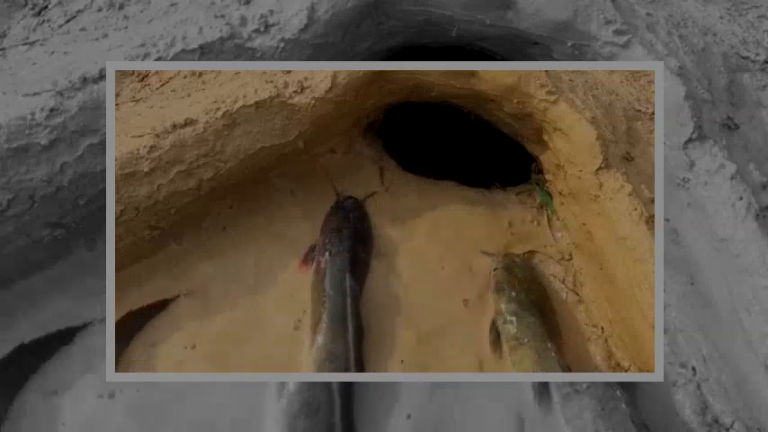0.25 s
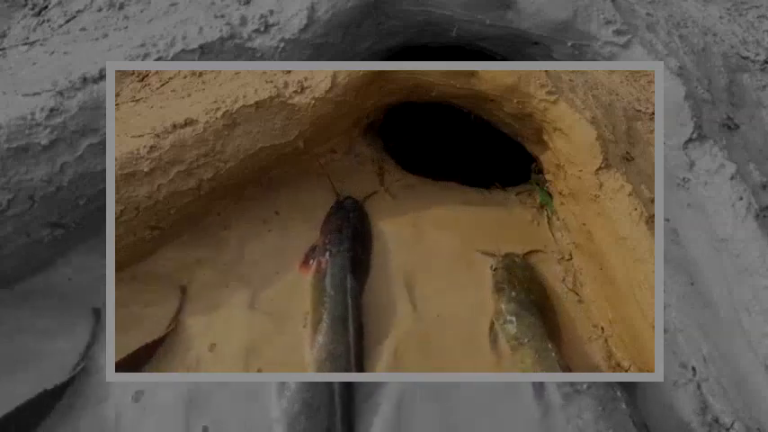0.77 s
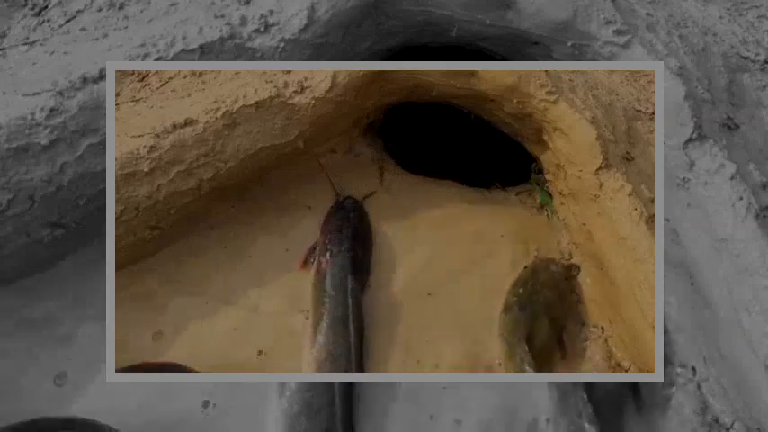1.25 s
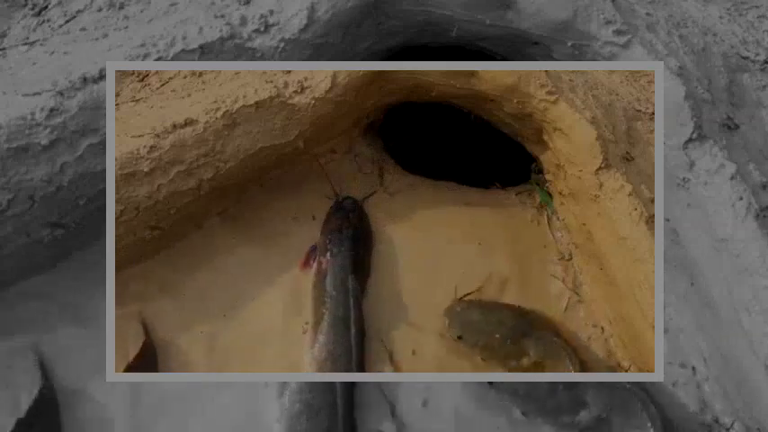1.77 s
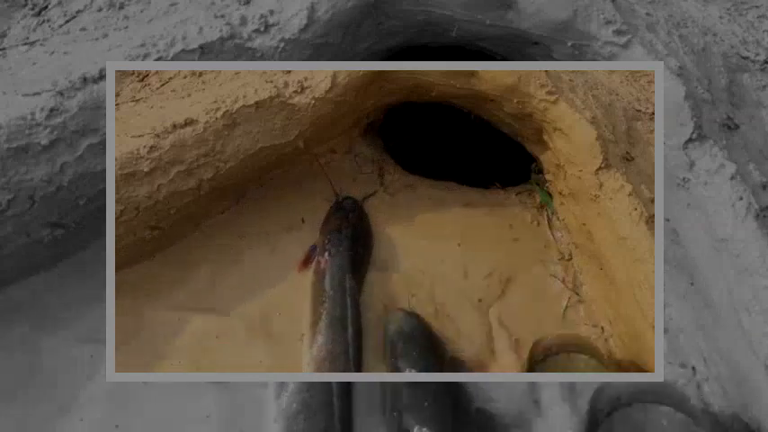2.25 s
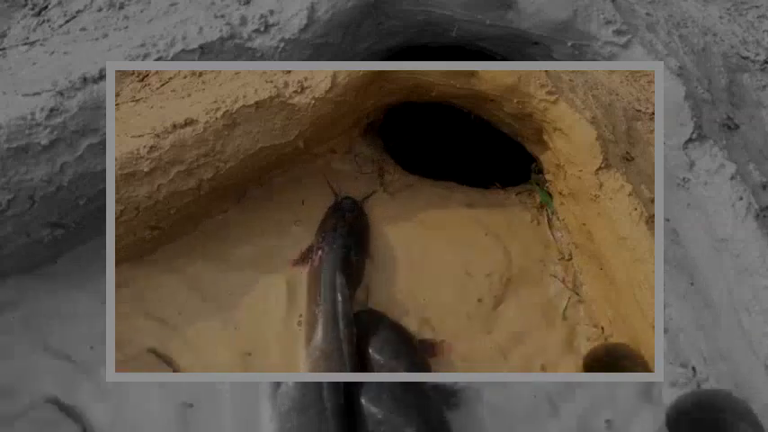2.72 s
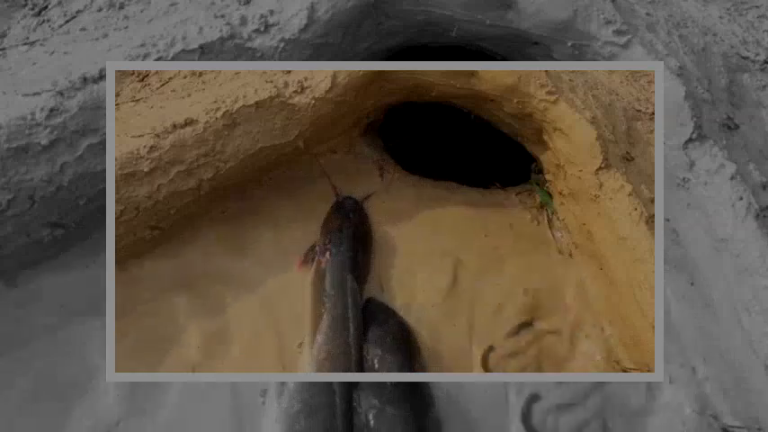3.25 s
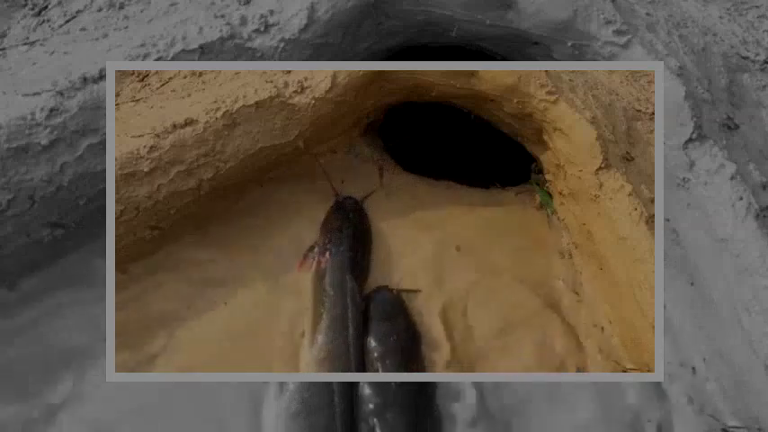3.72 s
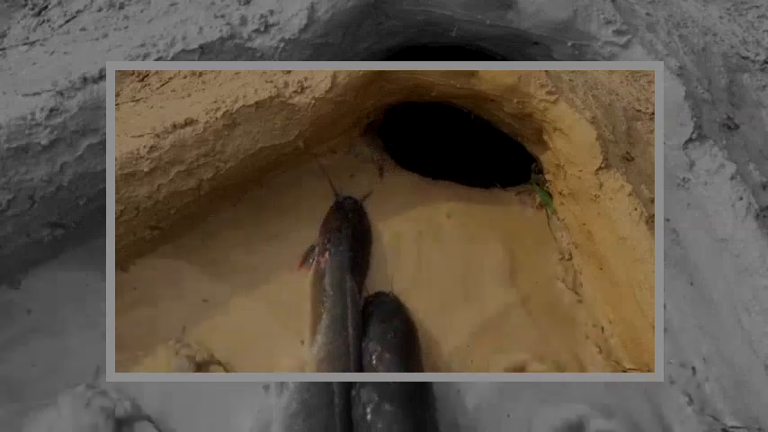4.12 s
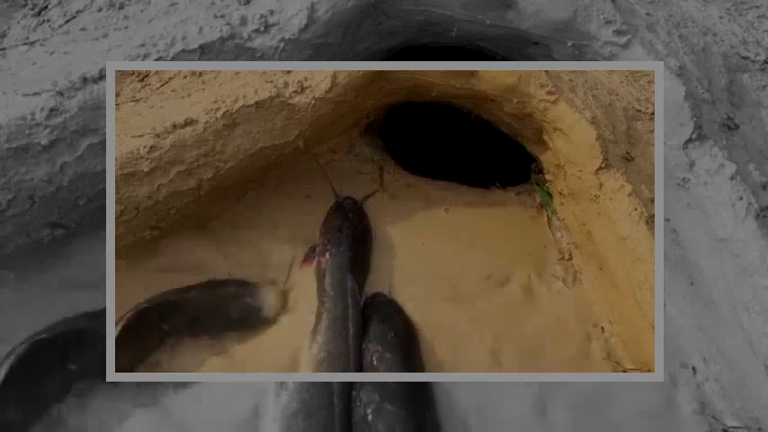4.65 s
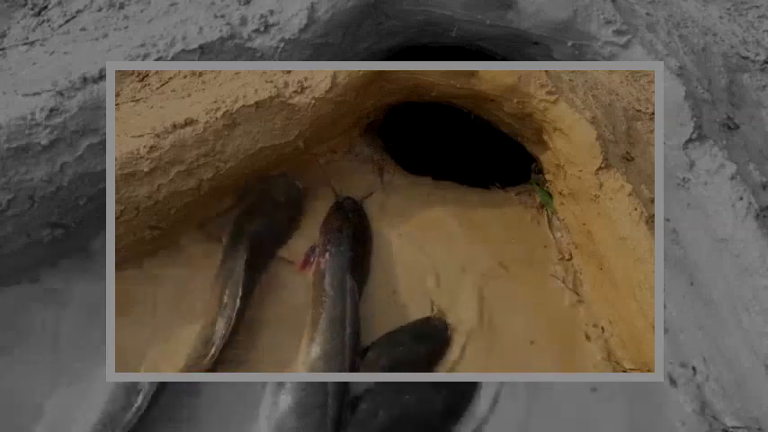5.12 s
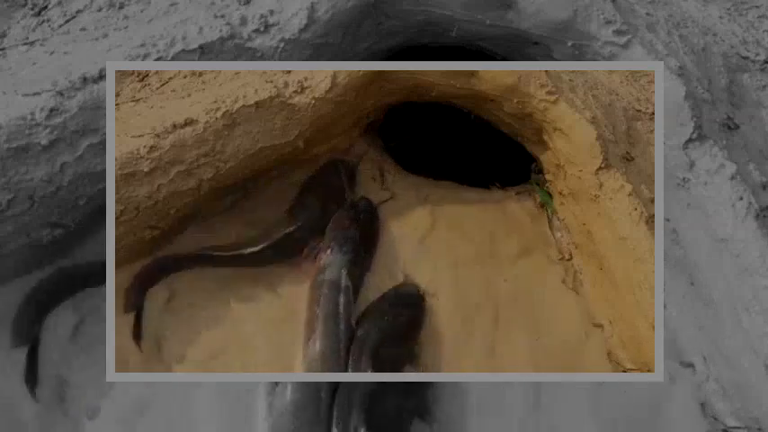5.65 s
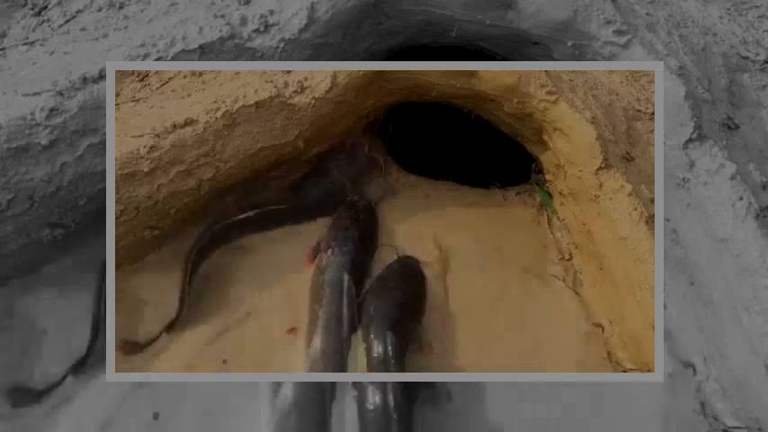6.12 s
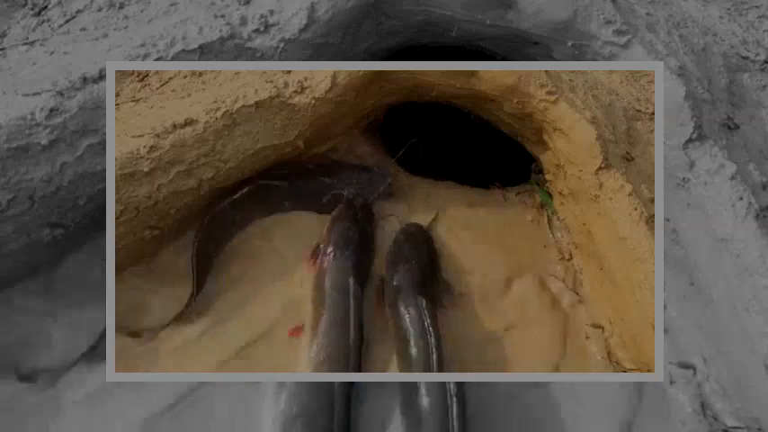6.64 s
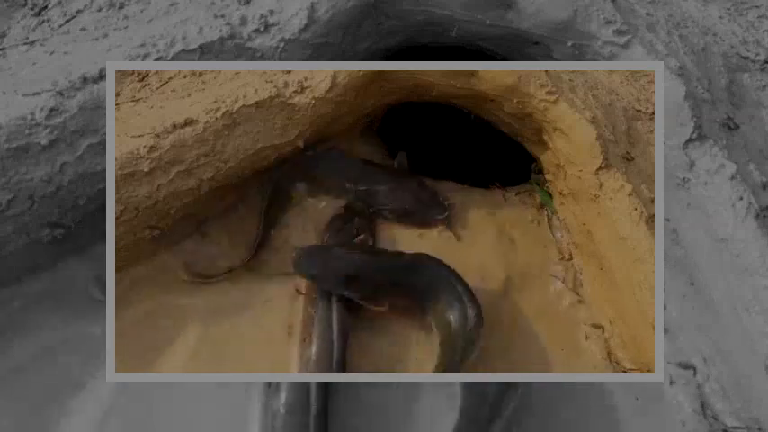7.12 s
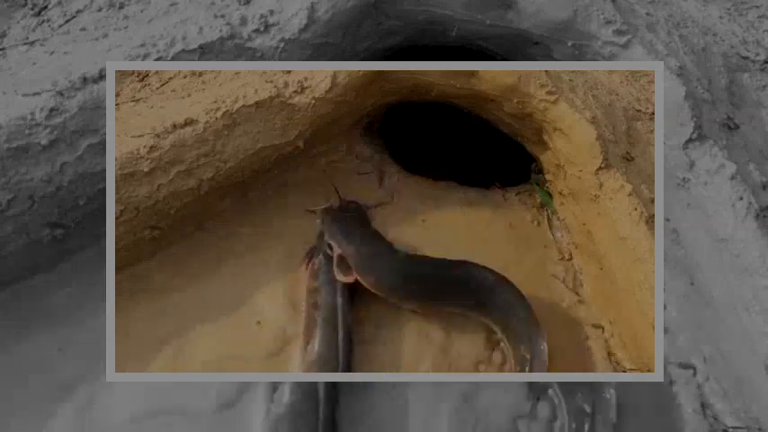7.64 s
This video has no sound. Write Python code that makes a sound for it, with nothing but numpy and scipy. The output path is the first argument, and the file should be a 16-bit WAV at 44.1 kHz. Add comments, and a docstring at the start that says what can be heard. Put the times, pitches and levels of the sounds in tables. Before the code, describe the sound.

Fish thrash in a shallow muddy pool under a clay bank. A quick cluster of wet pops, churning splashes and spits opens, then scattered plips and small bubbling strokes. The middle grows sparse, with faint lapping and soft glugs, before a loud double plop and vigorous splashing near the end. Close mono microphone, slightly hollow and metallic, with a short slap echo and low outdoor background.

```python
"""Catfish in a muddy pool

At the foot of a clay bank, catfish wriggle in shallow water under a low outdoor background, in mono.
Strokes of tail and body swell random bubble froth, throw spray and shove the water in low noise.
Air pockets in the wet mud pop and plip as gliding, choked sine rings; sinking sines make the glugs.
Fizzing and lapping never stop. All but the background has a slap echo, and two close copies
of the whole give a hollow, slightly metallic colour."""
import sys
import numpy as np
from scipy import signal
from scipy.fft import rfft, irfft, next_fast_len
from scipy.io import wavfile

SR = 44100
rng = np.random.default_rng(int(sys.argv[2]) if len(sys.argv) > 2 else 0)


def to_wav(sig):
    """Store sig (one row per channel, or 1-D mono) as 16-bit WAV at the path in sys.argv[1].

    Samples outside -1..1 are clipped; the rate is SR.
    """
    pcm = np.clip(np.atleast_2d(sig), -1, 1) * 32767
    pcm = np.round(pcm).astype(np.int16)
    wavfile.write(sys.argv[1], SR, pcm.T)  # frames by channels


N = 347508

# Air pockets that burst in the mud: (time [s], ring level [dB], pitch [Hz], ring length [s],
# snap level [dB], echo delay [s])
POCKETS = [(0.1, -16, 1023, 0.056, -39, 0.027), (.131, -20, 1370, 0.072, -4.5, 0.056),
           (0.176, -13, 985, 0.022, -28, 0.072), (.19, -30, 300, 0.023, -47, 0.066),
           (.204, -13.5, 931, 0.038, -10, 0.069), (.218, -23.5, 597, 0.044, -17, .068),
           (.295, -28, 2404, 0.048, -35, .051), (.376, -22.5, 4430, 0.002, -40, 0.062),
           (.555, -36, 2150, 0.013, -34, 0.051), (.5757, -30.5, 4060, 0.012, -49, 0.054),
           (.9687, -17, 2430, 0.0041, -44, .065), (1.068, -16.5, 967, 0.0088, -17.5, .057),
           (1.116, -37, 3720, .007, -37, .04), (1.2025, -33.5, 1960, 0.018, -32, 0.053),
           (1.2712, -22, 2700, 0.02, -28, 0.058), (1.272, -25.5, 1700, 0.024, -37, 0.058),
           (1.297, -27.5, 1730, 0.01, -50, .045), (1.378, -19.5, 2300, .0077, -19.5, .055),
           (1.556, -34.5, 1260, 0.0075, -51, 0.066), (1.6074, -33.5, 1225, 0.024, -28.5, 0.062),
           (1.656, -34.5, 4110, 0.01, -45, 0.048), (1.6826, -29, 1886, 0.019, -41, 0.065),
           (1.831, -30, 1864, 0.024, -55, 0.051), (1.901, -36, 303, 0.015, -38, .07),
           (1.955, -32.5, 330, 0.023, -50, 0.064), (2.066, -24, 2670, 0.005, -49, .048),
           (2.08, -29, 3190, 0.014, -53, 0.064), (2.2246, -26.5, 2546, 0.025, -48, .065),
           (2.2663, -13, 821, 0.027, -21, 0.058), (2.276, -16.5, 1035, 0.032, -39, 0.056),
           (2.29, -20.5, 857, 0.036, -46, 0.057), (2.3425, -15.5, 1490, 0.0083, -11, 0.061),
           (2.358, -24.5, 1090, 0.059, -21, 0.064), (2.4776, -21.5, 1347, .04, -35, 0.051),
           (2.478, -23, 4160, 0.0046, -40, .056), (2.498, -27, 1306, 0.023, -26, 0.067),
           (2.655, -35, 3770, .012, -49, 0.078), (2.7558, -21.5, 454, 0.0035, -21, 0.057),
           (2.763, -25.5, 1797, 0.017, -37, 0.047), (2.779, -29, 3360, 0.024, -44, 0.056),
           (2.9118, -36.5, 3700, 0.012, -43, .066), (3.2445, -18.5, 710, 0.015, -25, 0.062),
           (3.2925, -22, 1610, 0.0029, -39, .064), (3.392, -39.5, 1025, 0.051, -55, .06),
           (3.4335, -30.5, 1830, 0.0048, -59, .051), (3.516, -42.5, 1363, 0.049, -60, .058),
           (3.906, -26, 1720, 0.0061, -23, 0.054), (3.9396, -19.5, 2740, 0.017, -42, 0.063),
           (3.9925, -20.5, 1396, 0.025, -21, 0.066), (4.146, -37.5, 3560, 0.011, -53, .054),
           (4.158, -38, 1780, 0.02, -34, .054), (4.516, -38.5, 900, 0.015, -35, 0.036),
           (4.8, -32, 1610, 0.075, -60, 0.054), (4.908, -33, 580, 0.011, -53, 0.057),
           (5.3157, -25.5, 2440, 0.017, -36, 0.048), (5.3627, -20.5, 907, 0.024, -26, .057),
           (5.4006, -21, 1160, 0.0082, -27, 0.061), (5.4524, -22, 2840, 0.0029, -34, 0.057),
           (5.491, -34, 284, .022, -51, 0.058), (5.5285, -30, 3125, 0.017, -36, 0.068),
           (5.591, -22.5, 2042, 0.028, -37, .052), (5.594, -29, 3020, 0.017, -52, 0.049),
           (5.769, -18, 1496, 0.025, -33, .061), (5.783, -15.5, 1310, 0.033, -33, 0.065),
           (5.787, -14, 1770, 0.035, -33, .068), (5.801, -35, 2730, 0.042, -42, 0.068),
           (6.0755, -27, 2740, 0.016, -28.5, 0.064), (6.103, -32.5, 1330, 0.019, -26, 0.057),
           (6.429, -31.5, 2130, 0.023, -58, 0.061), (6.5359, -25.5, 4050, 0.0097, -41, 0.066),
           (6.554, -23, 1680, 0.0091, -20, 0.065), (6.633, -32, 1650, 0.033, -42, .059),
           (6.634, -36.5, 3630, 0.024, -57, 0.058), (6.8443, -28.5, 5830, 0.0045, -60, .064),
           (6.878, -33, 2550, 0.0077, -24.5, 0.062), (7.1217, -18.5, 2950, 0.0013, -29, 0.068),
           (7.1591, -2.5, 1146, 0.025, -3.5, 0.056), (7.161, -4.5, 2027, 0.016, -3, .058),
           (7.175, -12, 1096, 0.047, -13, .059), (7.3308, -11, 1510, 0.015, -23.5, .059),
           (7.376, -21, 2226, 0.022, -12.5, 0.07), (7.3917, -26.5, 1580, 0.0087, -29, 0.047),
           (7.5395, -11.5, 2400, 0.0048, -34, 0.071), (7.569, -21, 1110, 0.023, -23, 0.067),
           (7.6045, -18, 2400, .006, -36, 0.029), (7.64, -15.5, 1794, .062, -42, .074),
           (7.678, -5, 791, 0.079, -9, 0.066), (7.7, -16.5, 543, .15, -30, 0.059),
           (7.7, -2.5, 4680, 0.003, -38, .065), (7.711, -24, 1852, 0.11, -7, 0.066),
           (7.813, -16, 1067, 0.05, -19, 0.057), (7.845, -16, 1784, 0.059, -23, .066),
           (7.862, -17.5, 1360, 0.013, -30, .066)]
# Strokes of a tail or body: (time of its height [s], rise [s], churn level [dB],
# churn centre [Hz], spray level [dB])
BODY_STROKES = [(0.039, 0.046, -44.5, 1940, -50), (0.13, 0.024, -35, 2680, -29.5),
                (0.167, 0.014, -20, 930, -28), (0.209, 0.012, -22, 2000, -29),
                (0.292, .018, -28.5, 2350, -33.5), (.375, 0.016, -38.5, 1670, -45.5),
                (.47, 0.063, -48.5, 1020, -54.5), (0.554, 0.0085, -55, 2700, -42.5),
                (0.844, 0.093, -39.5, 1190, -54), (1.276, 0.015, -39.5, 2150, -69),
                (1.984, 0.006, -40, 1310, -47), (2.084, 0.033, -41.5, 1880, -83),
                (2.238, 0.0095, -32.5, 1460, -58), (2.339, 0.022, -31, 1510, -49),
                (2.488, 0.0054, -25, 2550, -64), (2.773, .02, -34, 1750, -70),
                (3.39, 0.033, -51.5, 1060, -93), (4.352, 0.046, -41, 1490, -51),
                (4.52, 0.055, -43, 950, -58.5), (4.681, 0.031, -40, 880, -65),
                (4.937, 0.044, -44, 1590, -53), (5.277, 0.015, -38.5, 1670, -49),
                (5.362, 0.027, -34, 1170, -57), (5.787, 0.016, -27.5, 2040, -66),
                (6.107, 0.013, -31, 2200, -70), (6.248, 0.035, -35.5, 1220, -46.5),
                (6.411, 0.027, -42, 1240, -81), (6.547, 0.015, -51, 2640, -46),
                (6.855, 0.0073, -38.5, 3020, -52), (7.38, 0.011, -31.5, 2420, -48),
                (7.645, 0.05, -28.5, 2100, -42), (7.696, 0.017, -16.5, 1750, -23.5),
                (7.762, 0.023, -23, 1020, -31.5), (7.822, 0.0051, -19, 1720, -50),
                (7.87, 0.033, -28.5, 1530, -40)]
# Low glugs of water sucked round a body: (time [s], length [s], first pitch [Hz], last pitch [Hz],
# level [dB])
CAVITY_GLUGS = [(3.27, 0.13, 517, 394, -46.5), (3.9, 0.12, 487, 384, -45.5), (3.94, 0.059, 161, 154, -39.5),
                (6.75, 0.22, 449, 431, -58)]
# Sharp spits of spray as wet skin parts from the mud: (time [s], level [dB])
SKIN_SPITS = [(0.13, -23.5), (.204, -25), (1.2722, -47), (1.376, -43), (1.943, -39.5), (2.3484, -29),
              (2.498, -40.5), (2.655, -40), (2.759, -20.5), (2.964, -41), (3.4335, -45.5), (4.051, -45),
              (4.629, -47), (6.074, -48), (6.5365, -27.5), (7.374, -30), (7.613, -36), (7.814, -31)]
# Spectrum of lapping water: (frequency [Hz], relative level [dB])
LAPPING_SPECTRUM = [(200, -26), (450, -12), (900, 3.5), (1400, 7), (2200, 7.5), (3300, -4.5), (5000, -20.5),
                    (9000, -44.5)]
# Spectrum of fine spray and fizz: (frequency [Hz], relative level [dB])
SPRAY_SPECTRUM = [(100, -26.5), (250, -34.5), (600, -3.5), (1500, -11.5), (3000, 5), (4800, -2.5),
                  (6300, -6), (8000, -15.5), (10500, -27), (12000, -27)]
# Spectrum of the outdoor background: (frequency [Hz], relative level [dB])
AIR_SPECTRUM = [(20, -36), (48, -2.5), (75, -2.5), (110, 0), (155, 1.5), (230, -0.5), (320, -6),
                (500, -11.5), (1000, -13), (2500, -33), (5000, -42.5), (10000, -47.5)]
# Close copies of the whole sound, a negative delay being early: (delay [s], level [dB])
CLOSE_COPIES = [(-.00658, -6), (.0022, -7.5)]
# Spectrum of the mist in a spit: (frequency [Hz], relative level [dB])
MIST_SPECTRUM = [(150, -29.5), (1000, -17), (2200, -2.5), (4200, 4.5),
                 (6000, -1.0), (8000, -10.5), (11000, -20.5)]
# Spectrum of shoved water: (frequency [Hz], relative level [dB])
PUSH_SPECTRUM = [(40, -33.5), (95, 11.5), (130, 9), (220, -16.0), (320, -4), (700, -36), (2000, -64.5)]
# Weighting of the churn, as the water is too shallow for large, low bubbles:
# (frequency [Hz], relative level [dB])
SHALLOW_WEIGHTING = [(250, -8), (400, -21), (540, 4.0), (1000, 7.5)]

AIR_DB, FIZZ_DB = -53.5, -66.5
# Lapping at rest; the wake is set against its stroke's churn and dies away from the stroke's height
LAP_DB, LAP_WAKE_DB, LAP_WAKE_S = -60.5, -22, 0.075
SLAP_S, SLAP_DB = .062, -7  # slap echo
EDGE_HZ = 11300  # upper band limit
FALL_PER_RISE = 1.38  # a stroke dies away more slowly than it builds
# The snap of the mud film follows its pocket's pitch by this power, from a reference pocket
SNAP_HZ, POCKET_HZ, SNAP_FOLLOWS = 2773, 1607, 0.64
# Share by which the reference pocket glides up; smaller pockets tend to glide more
GLIDE, GLIDE_SPREAD = 0.094, 0.036
SWELL = 0.042  # time constant of a pocket's opening, as a share of its ring length
THUD_DB, THUD_HZ, THUD_S = -20.5, 463, 0.013  # mud slumps into the pocket; dB against the snap
SQUELCH_DB, SQUELCH_S, SQUELCH_CYCLES = -18, 0.005, 21.5  # small bubbles; dB against the ring
# Faint pockets that burst at random times
SEEP_PER_S, SEEP_DB, SEEP_SPREAD_DB = 7.6, -51.5, 4
SEEP_LOW_HZ, SEEP_HIGH_HZ, SEEP_CYCLES = 1213, 4620, 70


def gain_of(db):
    """Turns decibels into an amplitude factor."""
    return 10 ** (np.asarray(db) / 20)


def evened(x):
    """Scales to rms 1."""
    return x / np.sqrt(np.mean(x ** 2) + 1e-20)


def add(mix, s, sound):
    """Mixes a sound in, in place, at time s."""
    part = mix[max(round(s * SR), 0):][:len(sound)]
    part += sound[:len(part)]


def delayed(x, s):
    """Shifts a sound later (or earlier) by s seconds."""
    place = np.arange(len(x))
    return np.interp(place - round(s * SR), place, x, 0, 0)


def with_slap(x):
    """Adds one slap echo."""
    return x + gain_of(SLAP_DB) * delayed(x, SLAP_S)


def coloured(x, points):
    """Filters x by a curve of (frequency [Hz], level [dB]) points, then scales to rms 1."""
    hz, db = np.transpose(points)
    size = next_fast_len(len(x))
    curve_db = np.interp(np.log(np.fft.rfftfreq(size, 1 / SR) + 1), np.log(hz), db)
    return evened(irfft(rfft(x, size) * gain_of(curve_db), size)[:len(x)])


def bubble(hz, life_s, glide, size=4000, choke=1.315):
    """A pocket of air rings until it is choked, 60 dB down at life_s; its pitch glides with its shape."""
    t = np.arange(size) / SR
    age = t / life_s
    # the pitch passes through hz at a fifth of the life
    turns = hz * t * (1 + np.clip(glide, -.2, .2) * (age / 2 - .2))
    onset = (1 - np.exp(-3 * hz * t)) ** 2  # most of the ring builds up within one cycle
    decay = np.exp(-np.log(1000) * age ** choke)
    return np.sin(2 * np.pi * turns) * onset * decay


def froth(length, base_per_s, spread_db, cycles, hiss, count=40):
    """Many small bubbles of random time, pitch and level ring over the hiss of torn water."""
    out = np.zeros(length)
    for hz in np.geomspace(450, 10000, count) * rng.uniform(.96, 1.04, count):
        # the base rate is shared among the pitches; higher bubbles are born more often
        chance = base_per_s / count / SR * np.sqrt(hz / 2000)
        births = rng.random(length) < chance
        levels = gain_of(spread_db * np.minimum(rng.exponential(1, length), 3))
        ring = bubble(hz, cycles / hz, rng.uniform(0.019, 0.23), size=1500)
        out += (hz / 2000) ** 0.12 * signal.oaconvolve(births * levels, ring)[:length]
    return evened(evened(out) + hiss * rng.standard_normal(length))


def air():
    """Low, steady outdoor background: noise with a fixed spectrum."""
    return gain_of(AIR_DB) * coloured(rng.standard_normal(N), AIR_SPECTRUM)


def stir():
    """The shallow water keeps fizzing and lapping, and laps more in the wake of a stroke."""
    t = np.arange(0, N / SR, .005)
    power = gain_of(LAP_DB) ** 2
    for s, _, churn_db, _, _ in BODY_STROKES:
        wake = gain_of(churn_db + LAP_WAKE_DB) * np.exp(-abs(t - s) / LAP_WAKE_S)
        power = power + (t > s) * wake ** 2
    lap_level = np.interp(np.arange(N) / SR, t, np.sqrt(power))
    lapping = coloured(froth(N, base_per_s=1000, spread_db=4.5, cycles=18, hiss=.6), LAPPING_SPECTRUM)
    fizz = coloured(froth(N, base_per_s=2000, spread_db=2.5, cycles=10, hiss=.5), SPRAY_SPECTRUM)
    return evened(with_slap(lapping)) * lap_level + evened(with_slap(fizz)) * gain_of(FIZZ_DB)


def glugs():
    """A large cavity opens behind a body: a soft hollow tone that sinks."""
    out = np.zeros(N)
    for s, length_s, first_hz, last_hz, db in CAVITY_GLUGS:
        hz = np.linspace(first_hz, last_hz, round(length_s * SR))
        tone = np.sin(2 * np.pi * np.cumsum(hz) / SR)
        add(out, s, gain_of(db) * np.hanning(len(hz)) * tone)
    return with_slap(out)


def strokes(push_db=-14, push_lag_s=0.023, size=22050):
    """Each stroke churns up a swell of bubbles round one pitch, throws fine spray and shoves the water."""
    out, t = np.zeros(N), np.arange(N) / SR
    bubbles = froth(N + size, base_per_s=1400, spread_db=5.5, cycles=20, hiss=.3)
    bubbles = coloured(bubbles, SHALLOW_WEIGHTING)
    spray = coloured(froth(N, base_per_s=3500, spread_db=4.5, cycles=14, hiss=.3), SPRAY_SPECTRUM)
    push = coloured(rng.standard_normal(N), PUSH_SPECTRUM)
    for s, rise_s, churn_db, hz, spray_db in BODY_STROKES:
        start = max(round(s * SR) - size // 3, 0)
        span = slice(start, start + size)
        age = t[span] - s
        # bell-shaped rise, exponential fall
        swell = np.exp(-np.where(age < 0, (age / rise_s) ** 2, age / (FALL_PER_RISE * rise_s)))
        band = [(hz / 5, -30), (hz / 2, -12), (hz / 1.07, -1), (hz * 1.08, 0), (hz * 2, -15), (hz * 4.9, -48)]
        churn = coloured(bubbles[span], band)[:len(age)]
        out[span] += swell * (gain_of(churn_db) * churn + gain_of(spray_db) * spray[span])
        # the shove follows late, its level set against the spray
        out[span] += delayed(swell, push_lag_s) * gain_of(spray_db + push_db) * push[span]
    return with_slap(out)


def pop(db, hz, life_s, snap_db, snap_cycles=8, side_db=-7, count=6):
    """The mud film snaps into tiny bubbles, the pocket under it rings, and the mud closes with a squelch."""
    snap_hz = SNAP_HZ * (hz / POCKET_HZ) ** SNAP_FOLLOWS
    snap_s = snap_cycles / snap_hz
    snap = bubble(snap_hz, snap_s, 0) + gain_of(THUD_DB) * bubble(THUD_HZ, THUD_S, 0)
    # two side bubbles, one lower and one higher than the snap, follow it shortly in either order
    side_ratios = rng.uniform([.76, 1.2], [.84, 1.34])
    for ratio, late_s in zip(side_ratios, rng.uniform(0.00071, .003, 2)):
        add(snap, late_s, gain_of(side_db) * bubble(snap_hz * ratio, snap_s, 0))

    glide = GLIDE * hz / POCKET_HZ + GLIDE_SPREAD * rng.standard_normal()
    ring = bubble(hz, life_s, glide)
    opening = 1 - np.exp(-np.arange(len(ring)) / SR / (SWELL * life_s))
    ring = ring * opening
    ring = ring / abs(ring).max()
    squelch_hz = hz * 2 ** rng.uniform(-0.46, 0.92, count)
    for small_hz, late in zip(squelch_hz, rng.uniform(0, 3.3, count)):
        small = bubble(small_hz, SQUELCH_CYCLES / small_hz, 0.2)
        add(ring, late * SQUELCH_S, gain_of(SQUELCH_DB) * np.exp(-late / 2) * small)
    return gain_of(db) * ring + gain_of(snap_db) * snap


def pops(mist_db=-35, seep_snap_db=-6, burst_s=0.0019, patter_s=0.012, patter=.25, size=4000):
    """Loud and faint pockets burst and spray flies, a little with every listed snap; a slap echo follows."""
    out, t = np.zeros(N), np.arange(size) / SR
    mist = coloured(rng.standard_normal(N), MIST_SPECTRUM)
    scatter = np.exp(-t / burst_s) + patter * np.exp(-t / patter_s)  # quick burst, longer patter
    spits = SKIN_SPITS + [(s, snap_db + mist_db) for s, *_, snap_db, _ in POCKETS]
    sounds = []  # (time [s], sound, echo delay [s])
    for s, db in spits:
        grain = mist[rng.integers(N - size):][:size]
        sounds.append((s, gain_of(db) * scatter * grain, SLAP_S))
    for s, *pocket, echo_s in POCKETS:
        sounds.append((s, pop(*pocket), echo_s))
    for _ in range(round(SEEP_PER_S * N / SR)):
        db = SEEP_DB + SEEP_SPREAD_DB * rng.standard_normal()
        hz = SEEP_LOW_HZ * (SEEP_HIGH_HZ / SEEP_LOW_HZ) ** rng.random()
        seep = pop(db, hz, SEEP_CYCLES / hz, db + seep_snap_db)
        sounds.append((rng.random() * N / SR, seep, SLAP_S))
    for s, sound, echo_s in sounds:
        add(out, s, sound)
        add(out, s + echo_s, gain_of(SLAP_DB) * sound)
    return out


def scene():
    """Strokes, glugs, stirred water and pops over the open air, in one channel."""
    return (air() + strokes() + glugs() + stir() + pops())[None]


def record(dry):
    """Close copies make the sound hollow; then it clips at full scale and loses the top of its band."""
    x = dry[0]
    for delay_s, db in CLOSE_COPIES:
        x = x + gain_of(db) * delayed(x, delay_s)  # the second copy also doubles the first
    x = np.clip(x, -1, 1)
    low_pass = signal.firwin(511, EDGE_HZ, window=("kaiser", 9), fs=SR)
    return signal.oaconvolve(x, low_pass, "same")[None]


dry = scene()
out = record(dry)
to_wav(out)
```